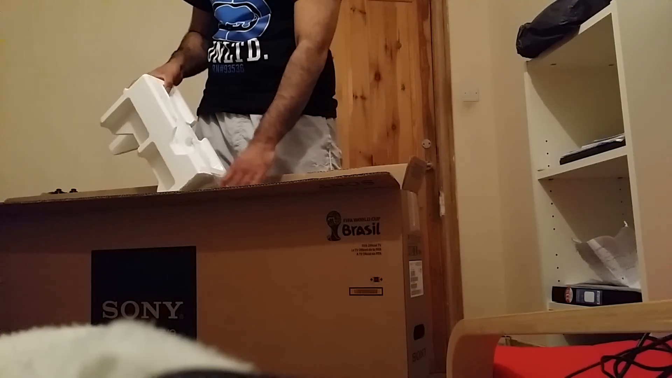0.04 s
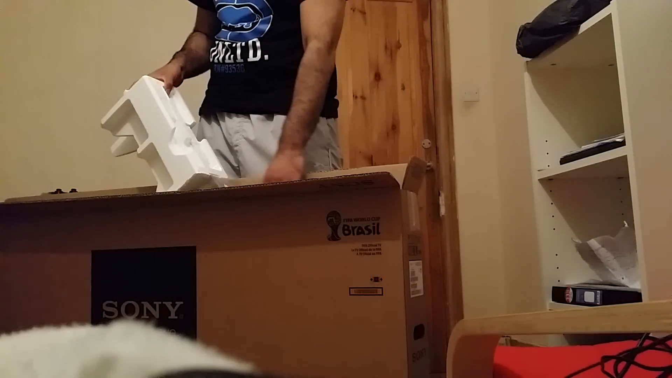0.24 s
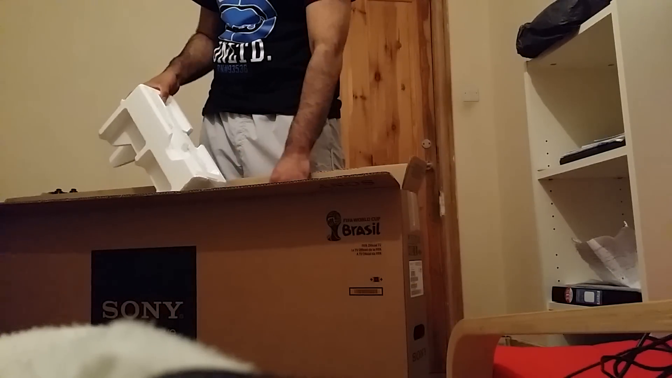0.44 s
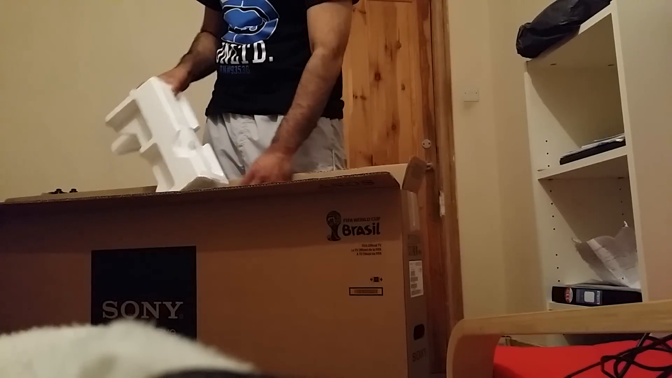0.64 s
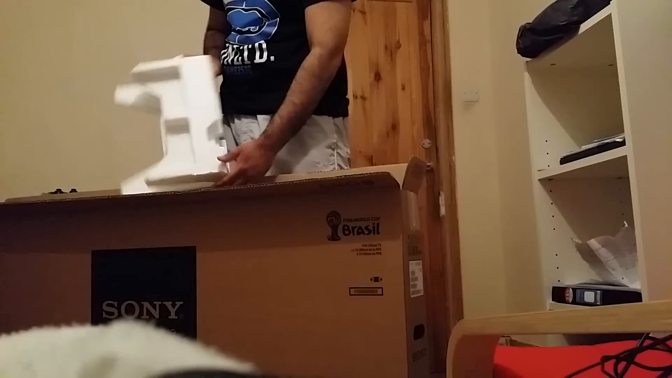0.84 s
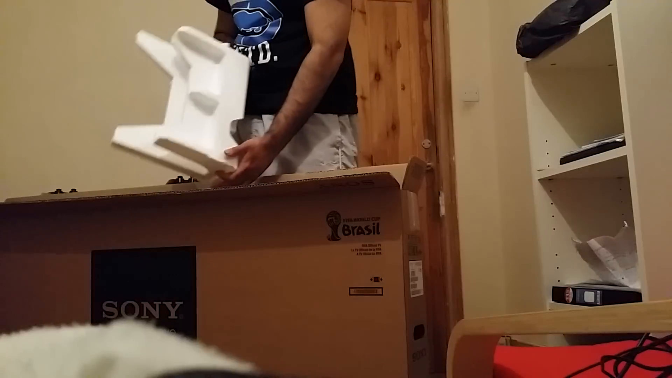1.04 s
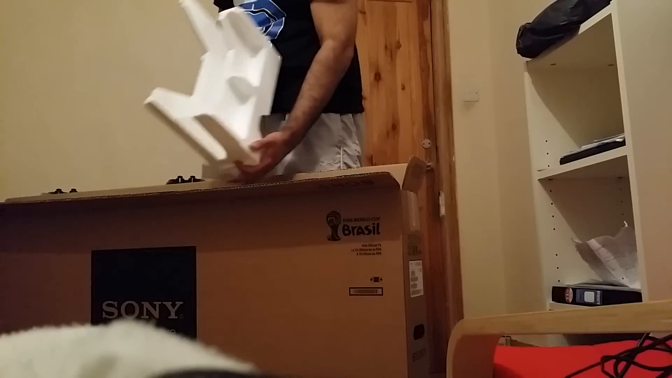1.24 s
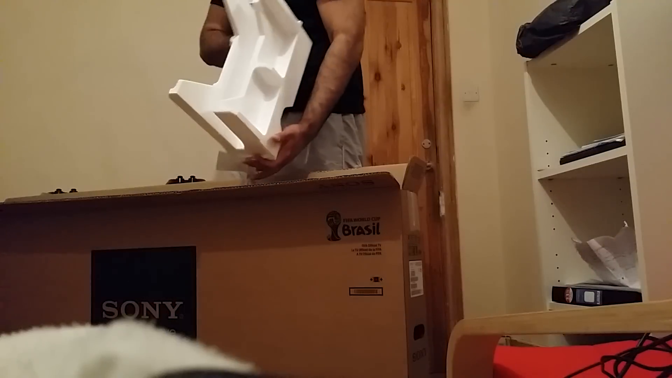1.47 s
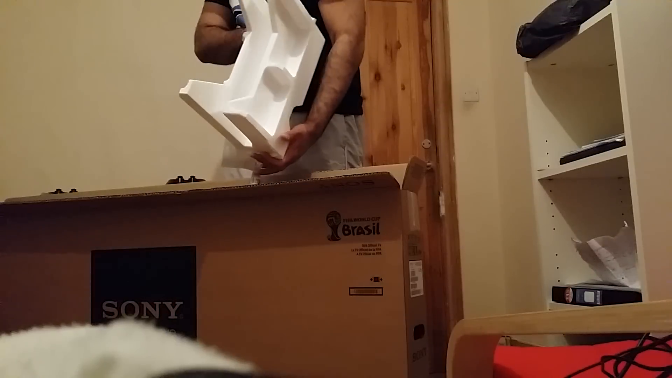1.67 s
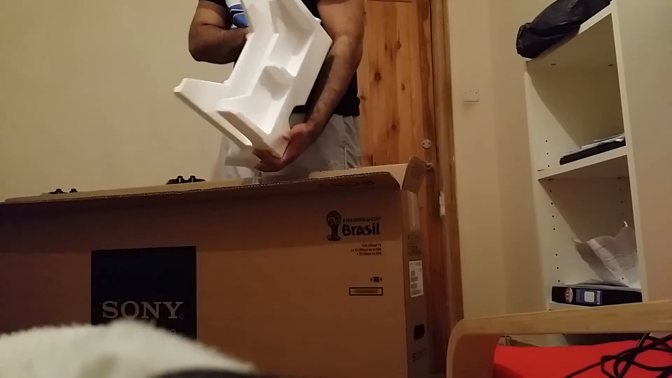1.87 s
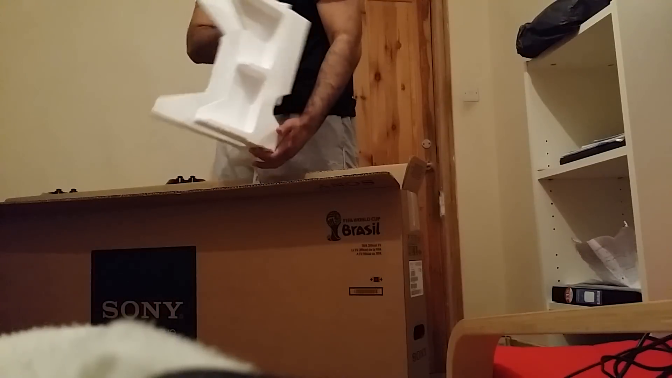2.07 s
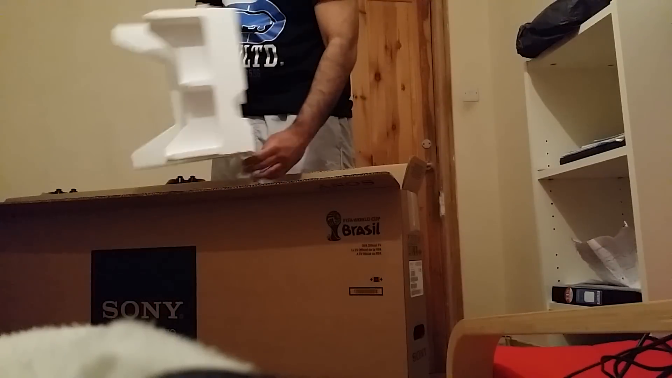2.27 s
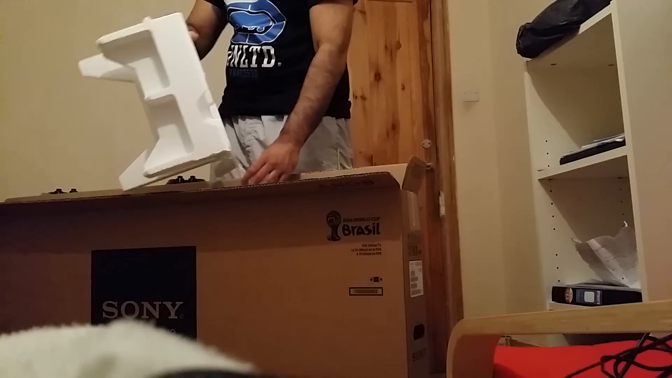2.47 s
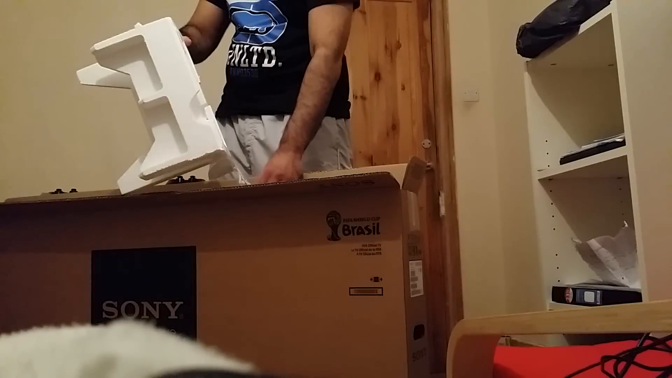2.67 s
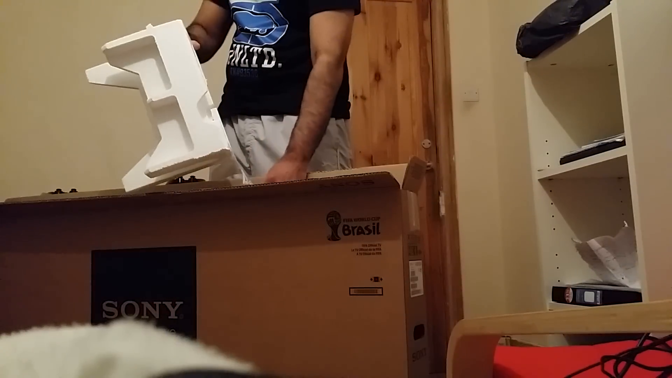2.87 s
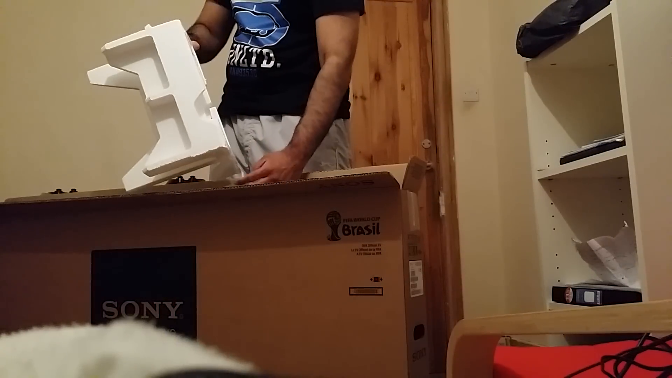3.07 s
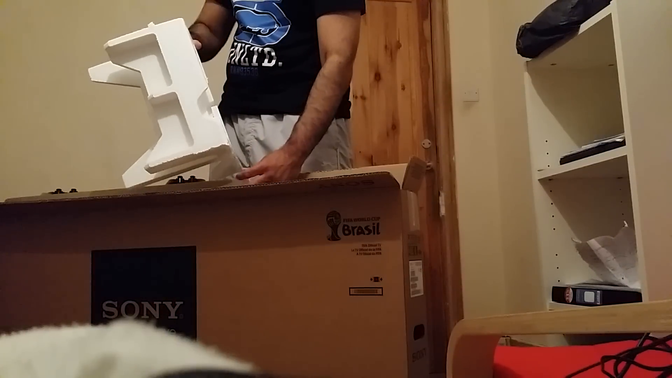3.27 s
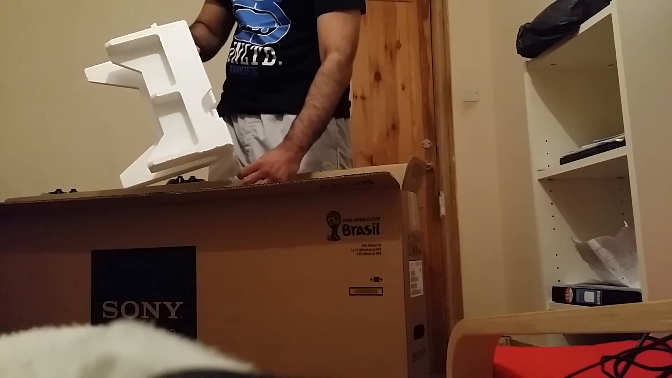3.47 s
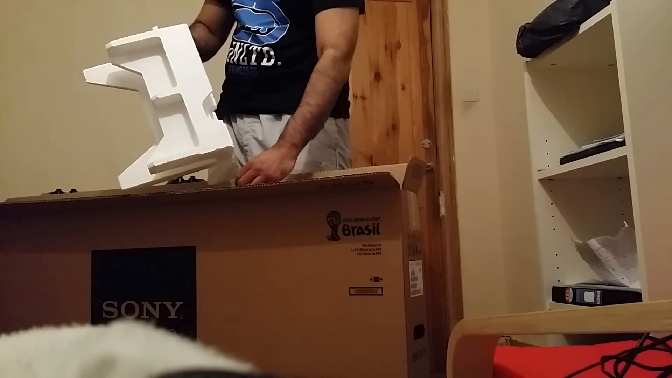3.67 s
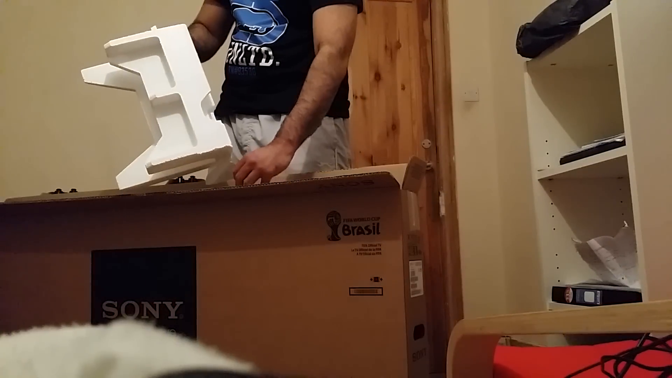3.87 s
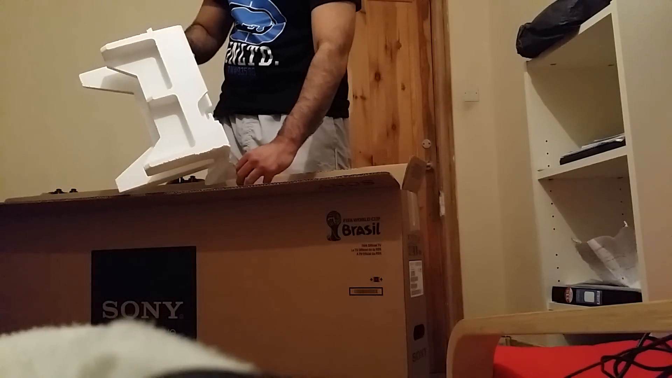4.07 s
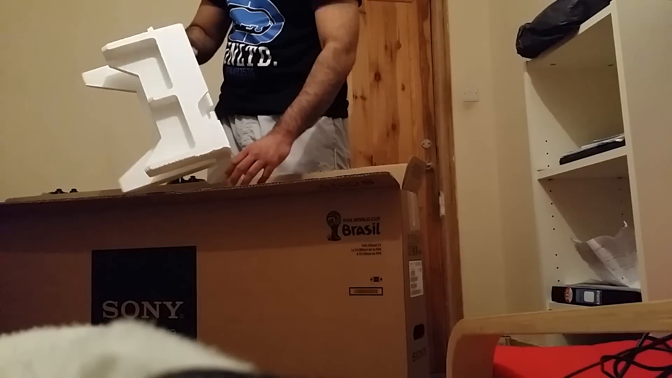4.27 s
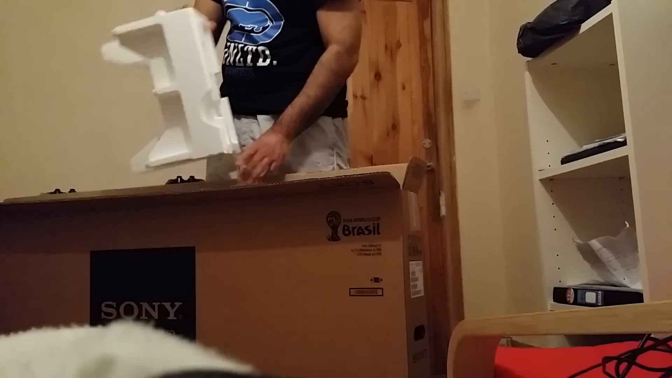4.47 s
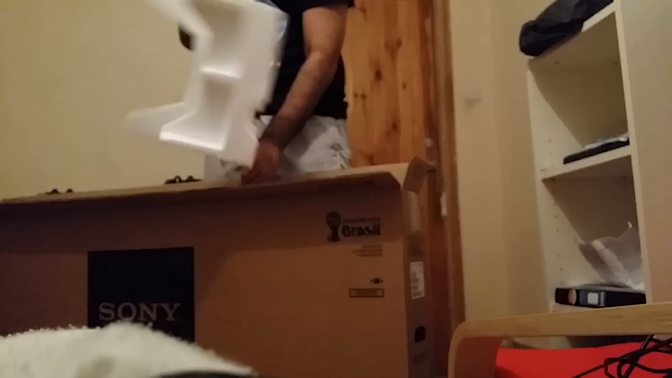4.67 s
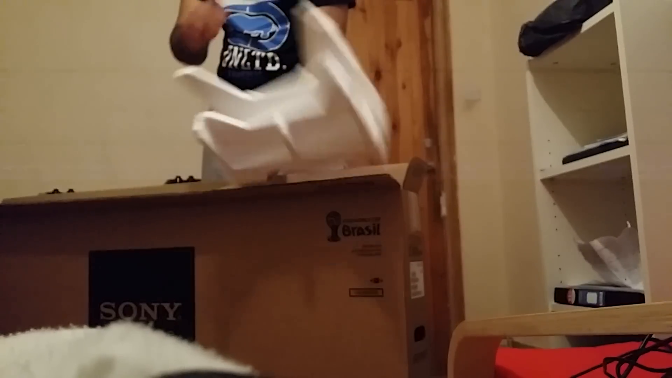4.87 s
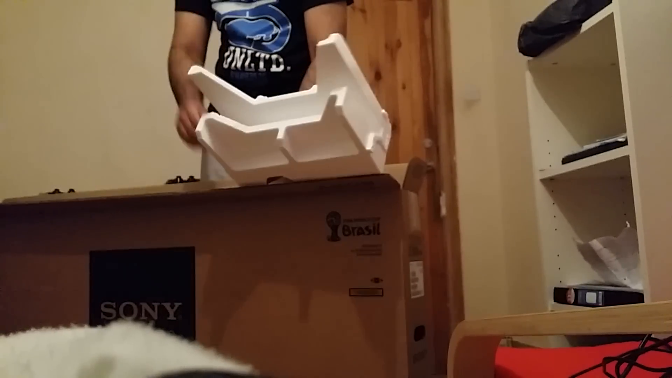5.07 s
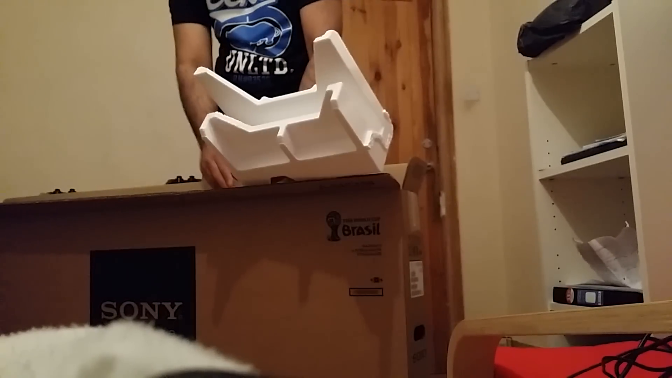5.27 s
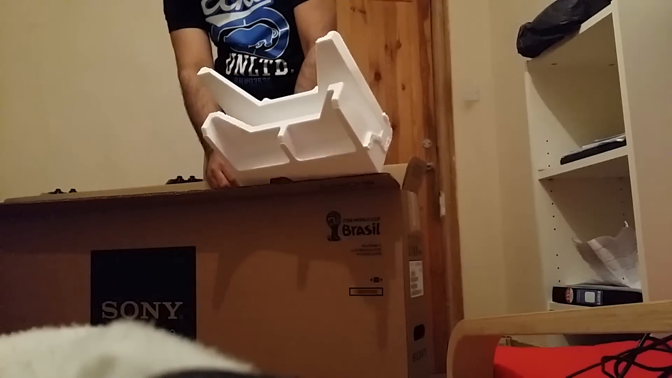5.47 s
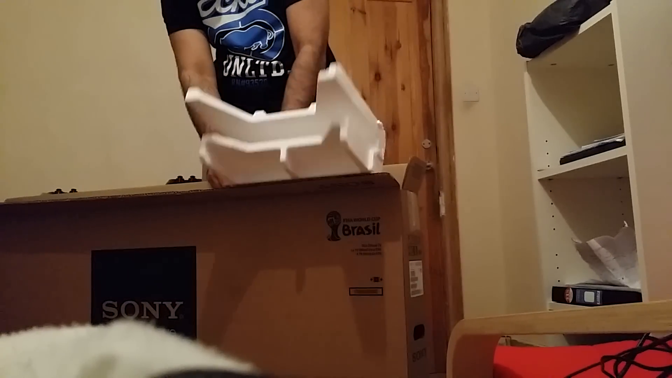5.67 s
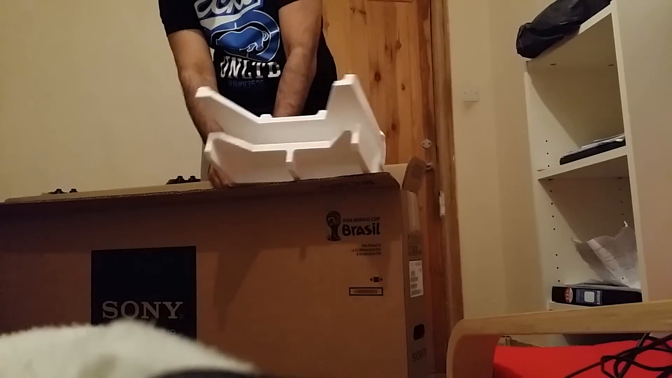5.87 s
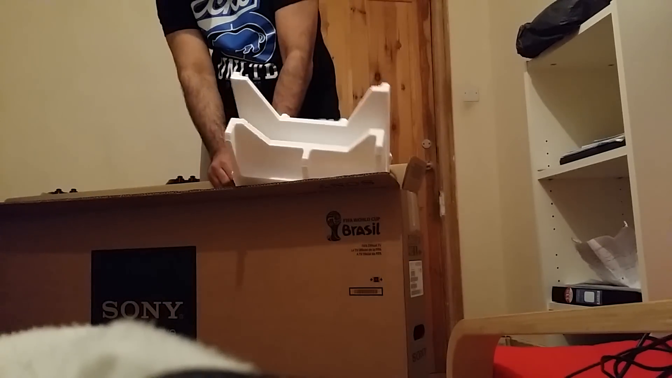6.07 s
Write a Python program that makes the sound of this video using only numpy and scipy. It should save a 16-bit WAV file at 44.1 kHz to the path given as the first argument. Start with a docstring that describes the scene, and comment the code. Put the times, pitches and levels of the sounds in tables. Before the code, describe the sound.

Hissing rubs, short scrapes and rubbery squeaks of packing foam handled on a cardboard box, with a loud knock near the end.

```python
"""A small, quiet room: a moulded polystyrene block is turned over and slid along a big cardboard box.
Its beads catch and slip on the card: a hiss, short scrapes and rubbery squeaks that ring the light foam.
Fingers tap it, the box booms when nudged, and the block is set down with one sharp knock.
Two close microphones hear it with short wall echoes and faint room noise."""
import sys
import numpy as np
from scipy import signal
from scipy.fft import rfft, irfft
from scipy.io import wavfile
from scipy.ndimage import uniform_filter1d

SR = 44100
rng = np.random.default_rng(int(sys.argv[2]) if len(sys.argv) > 2 else 0)


def pcm_store(signal):
    """Save signal as 16-bit PCM."""
    levels = np.round(np.clip(np.atleast_2d(signal), -1, 1) * 32767)
    wavfile.write(sys.argv[1], SR, levels.astype(np.int16).T)


N = 270050
TIME = np.arange(N) / SR


# Hand strokes. Each row: start in seconds, speed-up in seconds, slow-down in seconds, hiss level in dB,
# foam body in dB over the hiss, box rumble in dB over the hiss.
STROKES = [(.29, 0.034, 0.14, -54.5, -21, -13), (.44, 0.1, 0.041, -44.5, -18, -13.5),
           (.61, 0.067, 0.11, -43.5, -8.5, -13.5), (.745, 0.076, 0.049, -41.5, 0.5, 0.5),
           (.8, 0.088, 0.21, -37.5, -3, -2.5), (1.06, 0.057, 0.39, -51, -8, -15),
           (1.227, 0.16, 0.18, -35.5, -6, -15.5), (1.43, 0.17, 0.39, -42, -11.5, -13),
           (1.82, 0.085, 0.048, -42.5, -3, -10), (1.93, 0.089, 0.11, -37, -9, -12.5),
           (2.08, 0.11, 0.15, -40, -3, -13), (2.3, 0.19, 0.24, -40, 2, -15),
           (2.64, 0.19, 0.37, -45, -5, -9.5), (3.335, .05, .07, -47.5, -9, -16),
           (3.389, 0.14, 0.18, -41.5, 4, -9.5), (3.7, 0.1, 0.26, -52, -8.5, -15.5),
           (4.03, 0.26, 0.11, -46.5, -3.5, -12), (4.28, 0.25, 0.15, -42, -2, -10.5),
           (4.57, 0.039, 0.056, -42.5, 2.5, -21), (4.66, 0.085, 0.14, -35.5, -1, -17),
           (5.06, 0.039, 0.054, -49, 4.5, 14.5), (5.138, 0.013, 0.082, -41, -6.5, -1.5),
           (5.29, 0.034, 0.15, -49.5, -10, -34), (5.47, 0.032, 0.067, -44.5, -12.5, -36),
           (5.5, 0.16, 0.37, -42, -16, -20)]

def stroke_gains(speed_exponent=0.62, creep_db=(-55.5, -81, -66)):
    """Hiss, foam body and box rumble gains: they grow with speed, above a floor of creep in the grip."""
    power = undb(creep_db)[:, None] ** 2 * np.ones(N)
    for start, rise, fall, db, foam_db, box_db in STROKES:
        ramp = np.interp(TIME, [start, start + rise, start + rise + fall], [0, 1, 0])
        speed = np.sin(np.pi / 2 * ramp)
        peak_gains = undb(db + np.array([[0], [foam_db], [box_db]]))
        power += (peak_gains * speed ** speed_exponent) ** 2
    return np.sqrt(power)


# Resonances of the block. Each row: frequency in Hz, width in Hz, relative level in dB.
FOAM_MODES = [(360, 39, -0.5), (593.6, 54, 5.5), (775.5, 74, 2), (956, 72, 7.5), (1230, 380, -2.5),
              (1770, 250, -1.5), (2800, 2520, -9.5)]
# Dragging beads. Each row: frequency in Hz, relative level in dB.
HISS_SPECTRUM = [(300, -36), (1200, -1), (2200, -2), (3200, -4), (5200, -2), (7100, 2.5), (8800, -2.5),
                 (11000, -5.5), (14500, -11)]

def sliding(hiss_gain, body_gain, grip_db=1.2):
    """Beads drag over card and skin under a slightly uneven grip: they hiss and shake the foam."""
    grip = undb(grip_db * wander(per_s=45))
    hiss = through(bead_slips(per_s=5000, spread_db=3.5) * hiss_gain * grip, colour(HISS_SPECTRUM))
    body = through(bead_slips(per_s=900, spread_db=3) * body_gain * grip, resonances(FOAM_MODES))
    return hiss + body


def bead_slips(per_s, spread_db):
    """Countless tiny slips of uneven size; rms one."""
    size = undb(spread_db * np.minimum(rng.exponential(size=N), 5))
    slips = (rng.random(N) < per_s / SR) * size * rng.standard_normal(N)
    return slips / slips.std()


# Hard scrapes. Each row: start in seconds, swell in seconds, fade in seconds, slips per second,
# level in dB, crunch tilt in dB per octave, foam body in dB over the crunch.
SCRAPES = [(0.669, 0.0091, 0.03, 930, -38, -0.5, -4.5), (.893, 0.014, 0.031, 950, -24.5, 2, -6),
           (1.003, 0.021, 0.0092, 620, -23.5, -2.5, -5.5), (2.335, 0.009, 0.012, 320, -29.5, -8, -6),
           (2.454, 0.022, 0.0093, 360, -26.5, -6, -1), (2.527, 0.025, 0.0057, 363, -17.5, -7.5, -4.5),
           (2.672, 0.0068, .006, 510, -34, -6, -17), (3.08, 0.025, 0.043, 400, -28, -5, -7.5),
           (3.12, 0.024, 0.016, 400, -27, -4.5, 3.5), (3.152, 0.0039, 0.01, 750, -11.5, -3.5, -12),
           (4.215, 0.023, 0.023, 260, -36, -10.5, -12), (4.472, 0.022, 0.046, 550, -33, -5.5, -5),
           (4.837, 0.015, 0.005, 870, -20, -2, -8.5), (4.936, 0.0094, 0.015, 720, -26, -2.5, -7),
           (4.971, 0.0063, 0.0074, 750, -17, -0.5, -6)]
# Tearing beads, before the tilt. Each row: frequency in Hz, relative level in dB.
CRUNCH_SPECTRUM = [(300, -25.5), (1200, 2.5), (2000, 3.5), (3000, 4.5), (5200, 4), (7100, 9.5), (8800, 3),
                   (11000, 0.5), (14500, -2)]

def scraping(decay_slips=0.17):
    """Under pressure the foam sticks and slips; each slip kicks the body and tears at the beads."""
    push, crunch = np.zeros((2, N))
    for start, swell, fade, per_s, db, tilt_db, body_db in SCRAPES:
        t = TIME[:int((swell + 2 * fade) * SR)]
        force = undb(db) * np.where(t < swell, t / swell, np.exp(-2 * (t - swell) / fade))
        kicks, age_s, size = stick_slip(t, per_s, jitter=0.4, scatter_db=-1.5)
        tearing = size * np.exp(-age_s * per_s / decay_slips) * rng.standard_normal(len(t))
        timbre = colour([(hz, band_db + tilt_db * np.log2(hz)) for hz, band_db in CRUNCH_SPECTRUM])
        add(push, start, undb(body_db) * force * kicks / kicks.std())
        add(crunch, start, through(force * tearing / tearing.std(), timbre)[0])
    return through(push, resonances(FOAM_MODES)) + crunch


def stick_slip(t, per_s, jitter, scatter_db):
    """An uneven train of slips: the kicks, the time since the last one, and its size."""
    gap_draw, size_draw = rng.standard_normal((256, 2)).T
    slip_s = np.append(0, np.cumsum(np.exp(jitter * gap_draw[1:])) / per_s)
    latest = np.searchsorted(slip_s, t, side="right") - 1
    size = undb(scatter_db * size_draw[latest])
    kicks = np.diff(latest, prepend=-1) * size
    return kicks, t - slip_s[latest], size


# Finger and corner taps. Each row: start in seconds, body level in dB, crack level in dB.
TAPS = [(0.124, -7.5, -29), (0.293, -22, -22), (0.312, -18.5, -23), (0.35, -23, -22), (1.001, 0, -3.5),
        (1.255, -12, -33), (1.554, 2, 1), (1.66, -9, -13), (1.7745, 3, -0.5), (1.825, -4.5, -13),
        (2.054, -7, -9), (2.168, -12.5, -12.5), (2.674, 1, -13), (2.823, -17.5, -13), (2.945, -12.5, -20),
        (3.152, 8.5, 3.5), (3.158, 2, -0.5), (3.405, -14, -20), (3.585, -6, -20), (3.681, -13.5, -11.5),
        (4.146, -13, -9.5), (4.403, -14, -27), (5.839, -14.5, -36)]

def tapping(touches, crush_s=0.0015, fracture_db=-3.5, crush_db=2):
    """Each tap or touch rings the foam and cracks: one bead snaps with a thin tick, then a few crush."""
    push, crush, fracture = np.zeros((3, N))
    t = TIME[:SR // 20]
    crush_shape = unit(np.sqrt(t) * np.exp(-t / crush_s))
    for start, body_db, crack_db in list(TAPS) + touches:
        add(push, start, undb([body_db]))
        add(fracture, start, undb([crack_db + fracture_db]))
        add(crush, start, undb(crack_db + crush_db) * crush_shape)
    return through(push, resonances(FOAM_MODES)) + low_cut(fracture, hz=5000) + crushing(crush)


# Crushed beads. Each row: frequency in Hz, relative level in dB.
CRUSH_SPECTRUM = [(300, -17), (1200, -21), (2500, -2), (5000, 10.5), (7100, 13.5), (9500, 3), (14500, -7)]

def crushing(envelope):
    """Beads give way in a burst of bright noise."""
    return through(envelope * rng.standard_normal(N), colour(CRUSH_SPECTRUM))


def light_touches(hiss_gain, per_s=8, body_db=19, crack_db=15, scatter_db=2):
    """Fingers touch at random, firmer when the hiss is louder; rows as in TAPS."""
    hits = rng.random(N) < per_s / SR
    level_db = 20 * np.log10(hiss_gain) + scatter_db * rng.standard_normal(N)
    return [(start, body_db + db, crack_db + db) for start, db in zip(TIME[hits], level_db[hits])]


# Squeaks and groans. Each row: start in seconds, length in seconds, first and last resonance in Hz,
# level in dB.
SQUEAKS = [(2.279, 0.0196, 1720, 1360, -34.5), (2.335, 0.018, 1428, 920, -28),
           (2.354, 0.0304, 915, 890, -34.5), (3.079, 0.069, 1297, 2130, -35), (4.401, 0.063, 554, 440, -44),
           (4.505, 0.042, 420, 362, -44), (5.143, 0.034, 510, 340, -46)]

def squeaking(cycles_per_slip=2.2, ring_cycles=1.3):
    """A corner chatters on the card; each slip twangs a resonance that glides with the pressure."""
    track = np.zeros(N)
    for start, length, first_hz, last_hz, db in SQUEAKS:
        t = TIME[:int(length * SR)]
        _, age_s, size = stick_slip(t, first_hz / cycles_per_slip, jitter=0.257, scatter_db=1.5)
        cycles = age_s * np.linspace(first_hz, last_hz, len(t))
        twang = size * np.exp(-cycles / ring_cycles) * np.sin(2 * np.pi * cycles)
        twang = uniform_filter1d(twang, size=9)
        twang = (twang - twang.mean()) / twang.std()
        add(track, start, undb(db) * signal.windows.tukey(len(t), 0.3) * twang)
    return track


# Even rubs. Each row: start in seconds, length in seconds, first and last pitch in Hz, level in dB.
SINGING_RUBS = [(1.0, 0.051, 1470, 1470, -37), (1.291, 0.14, 960, 958, -46),
                (1.411, 0.12, 1011, 980, -47.5), (2.277, .028, 1640, 1530, -40),
                (3.146, 0.025, 959, 958, -25.5), (3.465, 0.085, 1020, 1018, -45),
                (3.543, 0.058, 704, 705, -47), (4.506, 0.055, 407, 350, -42.5),
                (4.841, 0.038, 934, 970, -39), (5.135, 0.078, 212, 289, -45)]

def singing(pitch_waver=0.013, flutter_db=2.5):
    """In an even rub the slips lock to one resonance of the foam, which sings with a fluttering tone."""
    track = np.zeros(N)
    for start, length, first_hz, last_hz, db in SINGING_RUBS:
        n = int(length * SR)
        hz = np.linspace(first_hz, last_hz, n) * (1 + pitch_waver * wander(per_s=144)[:n])
        gain = undb(db + flutter_db * wander(per_s=105)[:n]) * signal.windows.tukey(n, 0.6)
        add(track, start, gain * np.sqrt(2) * np.sin(2 * np.pi * np.cumsum(hz) / SR))
    return track


# Clacks of the block landing and rocking, with one early echo. Each row: start in seconds, level in dB.
CLACKS = [(4.9955, 11), (4.9991, 17.5), (5.012, 1), (5.0374, 7), (5.051, 6.5)]
# One hollow clack. Each row: frequency in Hz, relative level in dB.
CLACK_SPECTRUM = [(40, -54), (120, -12.5), (250, -8), (480, -4), (750, 1), (1050, 1.5), (1450, -2),
                  (1800, -11.5), (3000, -21.5), (6000, -20.5), (14000, -36)]
# Modes of the block on the box. Each row: frequency in Hz, relative level in dB, T60 in seconds.
LANDED_MODES = [(72.5, -36, 0.47), (119, -15, 0.19), (173.8, -15, 0.24), (281.4, -4.5, 0.28),
                (334, -7, .23), (388, -6, 0.11), (420, -11.5, 0.36), (484, -18, 0.3), (598, -6.5, 0.33),
                (696, -6.5, 0.38), (755, -2.5, 0.31), (905, -1.5, 0.23), (1037, 6.5, 0.095),
                (1256, 2, 0.094), (1356, -16, 0.09), (1510, -11, 0.16)]

def knocking(pitch_waver=0.017, build_s=0.0081, ring_db=14.5):
    """A quick run of hollow clacks; foam and box ring from the first, bent by the rocking load."""
    push, ringing = np.zeros((2, N))
    for start, db in CLACKS:
        add(push, start, undb([db]))
    t = TIME[:SR * 2 // 3]
    modes = 0
    for hz, db, t60 in LANDED_MODES:
        phase = rng.random()
        bent_hz = hz * (1 + pitch_waver * wander(per_s=115)[:len(t)])
        cycles = phase + np.cumsum(bent_hz) / SR
        modes += undb(db) * np.exp(-np.log(1000) * t / t60) * np.sin(2 * np.pi * cycles)
    add(ringing, CLACKS[0][0], unit(modes * (1 - np.exp(-t / build_s))))
    clack = through(through(push, colour(CLACK_SPECTRUM)), room(wet_db=-1))
    lean_right = undb([[-0.3], [0.3]])
    return lean_right * (clack + undb(ring_db) * through(ringing, room(wet_db=-9.5)))


# Pushes on the box. Each row: start in seconds, level in dB, contact time in seconds.
NUDGES = [(.554, -7, 0.01), (0.781, -7, 0.0078), (.825, 5.5, .01), (.9, -2, 0.0015), (0.922, 5.5, 0.0023),
          (1.768, -11.5, 0.0023), (2.28, -15, 0.011), (2.465, -14.5, 0.0019), (2.569, -26, .002),
          (2.849, -8, .007), (4.217, -18, 0.002), (5.009, 5, 0.0023), (5.045, 3, 0.011)]
# Panel resonances. Each row: frequency in Hz, width in Hz, relative level in dB.
BOX_MODES = [(69.7, 5.1, -3), (118, 36, -6), (177, 20, 3.5), (291, 53, 1.5), (416, 840, -12)]
# Rubbed panels. Each row: frequency in Hz, relative level in dB.
RUMBLE_SPECTRUM = [(48, -14), (70, 2), (110, -12), (170, 2), (260, 0), (360, 1), (520, -2.5), (900, -14),
                   (3000, -70)]

def booming(rumble_gain):
    """Pushes flex the wide cardboard panels, the softer the deeper; sliding makes them rumble."""
    push = np.zeros(N)
    for start, db, contact_s in NUDGES:
        contact = signal.windows.hann(int(contact_s * SR))
        add(push, start, undb(db) * contact / contact.sum())
    boom = through(push, resonances(BOX_MODES))
    rumble = through(bead_slips(per_s=450, spread_db=1) * rumble_gain, colour(RUMBLE_SPECTRUM))
    return through(boom + rumble, room(wet_db=-2.5))


# Room decay. Each row: frequency in Hz, T60 in seconds.
ROOM_T60 = [(80, 0.28), (250, 0.26), (500, 0.2), (1000, 0.23), (3000, 0.24), (7000, 0.24), (14000, 0.26)]

def wall_echoes(build_s=0.00073, alike_hz=1000, bass_likeness=0.57):
    """Wall echoes die away band by band at two close microphones, alike in the bass."""
    t = TIME[:SR * 2 // 3]
    hz = np.fft.rfftfreq(len(t), 1 / SR)
    centres_hz = np.geomspace(60, 15000, 20)
    likeness = bass_likeness / (1 + (hz / alike_hz) ** 2)
    mid, side = rfft(rng.standard_normal((2, len(t))))
    field = mid * np.sqrt(1 + likeness) + np.array([side, -side]) * np.sqrt(1 - likeness)
    build = 1 - np.exp(-t / build_s)
    tail = 0
    for centre, weights in zip(centres_hz, np.eye(len(centres_hz))):
        band = curve_at(np.column_stack([centres_hz, weights]), hz)
        decay = np.exp(-np.log(1000) * t / curve_at(ROOM_T60, centre))
        tail += unit(irfft(field * band, len(t)) * build * decay) * np.sqrt(band.mean())
    return unit(tail)


def roaming_echoes(x, spots=8):
    """Contacts hop all over the big block, and each spot has its own pattern of wall echoes."""
    shares = np.array([wander(per_s=70) for _ in range(spots)])
    shares /= np.sqrt(np.sum(shares ** 2, axis=0))
    return sum(through(x * share, wall_echoes()) for share in shares)


def near_wall(x, delay_s=0.0066, echo_db=-5.5):
    """The sound plus its first echo, off the wall beside the box."""
    return x + undb(echo_db) * np.pad(x, ((0, 0), (int(delay_s * SR), 0)))[:, :N]


def room(wet_db):
    """Response of direct sound plus echoes for a source that stays put."""
    response = undb(wet_db) * wall_echoes()
    response[:, 0] += 1
    return unit(mic_delay(response))


def mic_delay(x, samples=4):
    """Sound reaches the left microphone first."""
    return np.vstack([x[0], np.append(np.zeros(samples), x[-1, :-samples])])


# Room noise. Each row: frequency in Hz, relative level in dB.
AIR_SPECTRUM = [(18, -30), (30, -22), (119, 5.5), (337, -3.5), (485, -2.5), (754, 5.5), (2430, -6),
                (4900, -2.5), (6700, -17), (13200, -51), (15000, -44)]

def room_air():
    """The faint steady noise of the room."""
    noise = through(rng.standard_normal(N), colour(AIR_SPECTRUM))
    return undb(-59) * through(noise, room(wet_db=2.5))


def undb(db):
    """Decibels to gain."""
    return 10 ** (np.asarray(db) / 20)


def unit(response):
    """Scale to an energy of one."""
    return response / np.sqrt(np.sum(response ** 2, axis=-1, keepdims=True))


def curve_at(points, hz):
    """Read (Hz, value) points on a log-frequency axis."""
    point_hz, value = np.transpose(points)
    return np.interp(np.log(np.maximum(hz, 1)), np.log(point_hz), value)


def add(track, start_s, sound):
    """Mix a sound into a track."""
    start = int(start_s * SR)
    part = sound[:len(track) - start]
    track[start:start + len(part)] += part


def through(x, response):
    """Pass a signal through a mono or stereo response."""
    return signal.fftconvolve(np.atleast_2d(x), np.atleast_2d(response), axes=1)[:, :N]


def colour(points, size=2048):
    """Minimum-phase response shaped by (Hz, dB) points."""
    gain = undb(curve_at(points, np.fft.rfftfreq(size, 1 / SR)))
    cepstrum = irfft(np.log(gain))
    cepstrum[1:size // 2] *= 2
    cepstrum[size // 2 + 1:] = 0
    return unit(irfft(np.exp(rfft(cepstrum))))


def resonances(modes):
    """Response of damped modes; neighbours swing in opposite senses."""
    t = TIME[:SR // 2]
    response = 0
    for k, (hz, width_hz, db) in enumerate(modes):
        envelope = undb(db) * width_hz * np.exp(-np.pi * width_hz * t)
        response += (-1) ** k * envelope * np.cos(2 * np.pi * hz * t)
    return unit(response)


def wander(per_s):
    """Smooth random drift with a spread near one."""
    hold = int(SR / per_s)
    steps = np.repeat(rng.standard_normal(N // hold + 1), hold)
    return np.sqrt(2) * uniform_filter1d(uniform_filter1d(steps, hold), hold)[:N]


def low_cut(x, hz):
    """Second-order high-pass."""
    return signal.sosfilt(signal.butter(2, hz, "highpass", fs=SR, output="sos"), x)


def scene():
    """The handled block and its echoes, its squeaks, the box, the knock and the quiet room."""
    hiss_gain, body_gain, rumble_gain = stroke_gains()
    rubs = sliding(hiss_gain, body_gain) + scraping()
    taps = tapping(light_touches(hiss_gain))
    near = mic_delay(undb(-10) * rubs + undb(-8.5) * near_wall(taps))
    echoes = roaming_echoes(undb(-2.5) * rubs + undb(-3.5) * taps)
    handling = low_cut(near + echoes, hz=140)  # the handling sounds carry little deep bass
    squeaks = through(squeaking(), room(wet_db=1)) + through(singing(), room(wet_db=-3.5))
    box = low_cut(booming(rumble_gain), hz=47.7)
    return handling + squeaks + box + knocking() + room_air()


# Microphone balance. Each row: frequency in Hz, left level in dB over the right.
LEFT_BIAS = [(60, -5), (130, -2.5), (300, -3), (1000, -4), (2000, -4.5), (4000, -1.5), (8000, 1),
             (12000, -2)]

def record(dry, low_cut_hz=52, top_hz=14550, ceiling=0.86):
    """Each microphone colours the sound; the recorder rounds the peaks and cuts deep bass and top."""
    bias_db = curve_at(LEFT_BIAS, np.fft.rfftfreq(2 * N, 1 / SR))
    mic_gains = undb([bias_db / 2, -bias_db / 2])
    heard = irfft(rfft(dry, 2 * N) * mic_gains)[:, :N]
    rounded = ceiling * np.tanh(low_cut(heard, low_cut_hz) / ceiling)
    return signal.sosfilt(signal.ellip(10, 0.2, 90, top_hz, fs=SR, output="sos"), rounded)


dry = scene()
out = record(dry)
pcm_store(out)
```